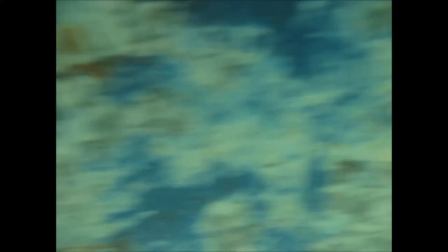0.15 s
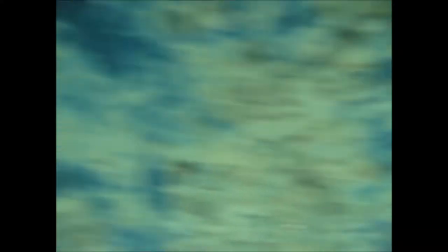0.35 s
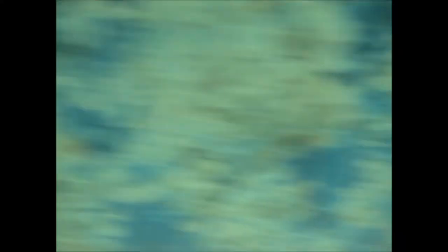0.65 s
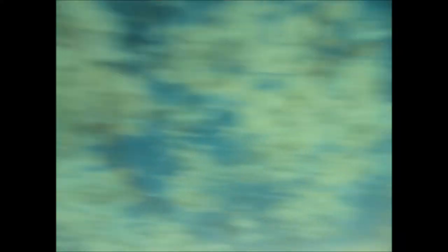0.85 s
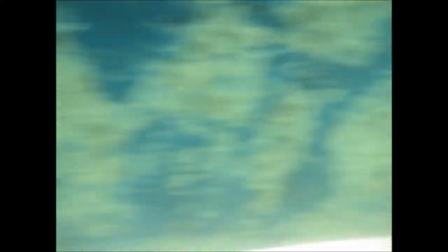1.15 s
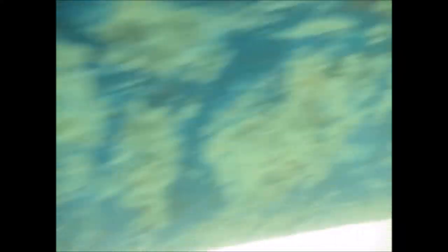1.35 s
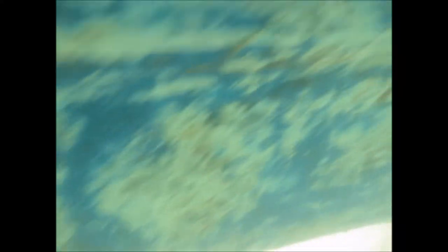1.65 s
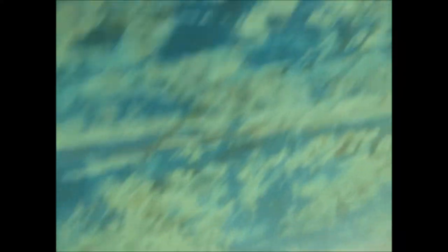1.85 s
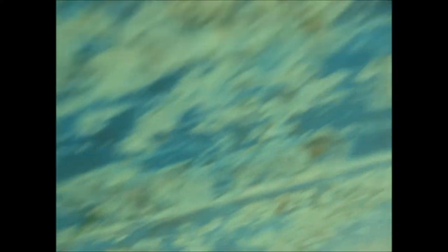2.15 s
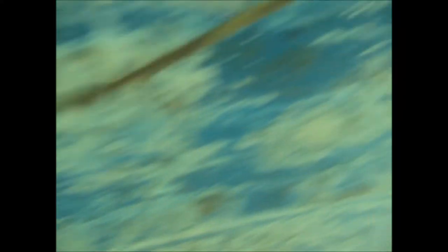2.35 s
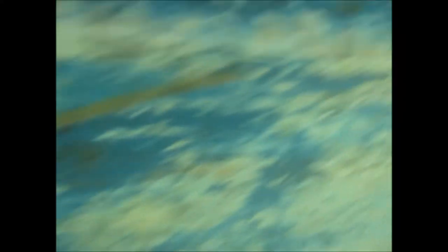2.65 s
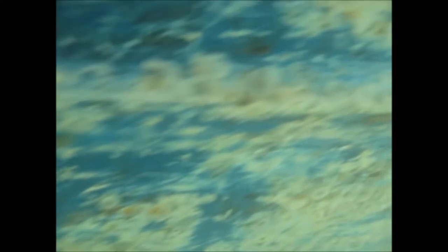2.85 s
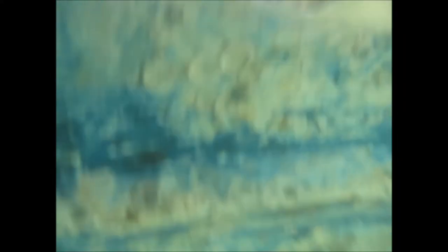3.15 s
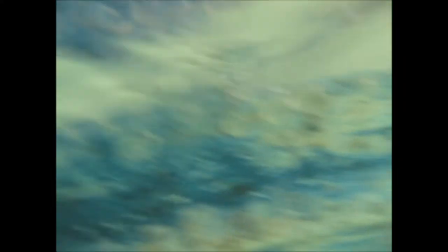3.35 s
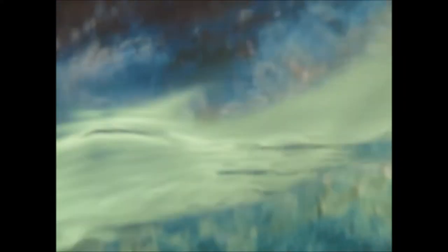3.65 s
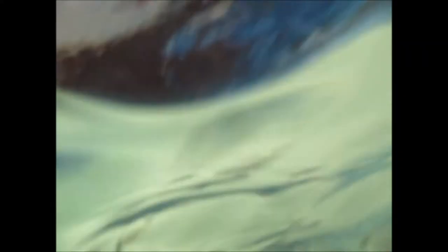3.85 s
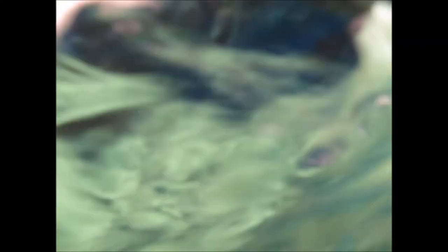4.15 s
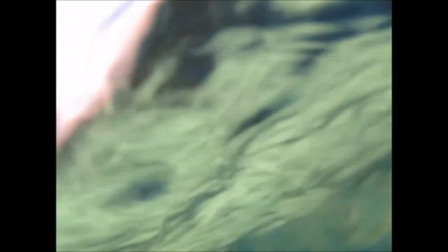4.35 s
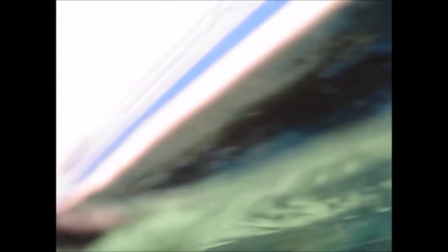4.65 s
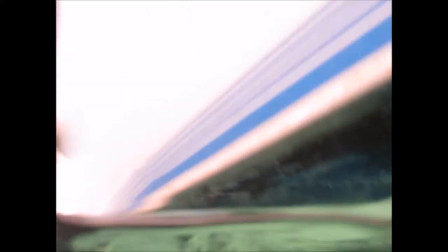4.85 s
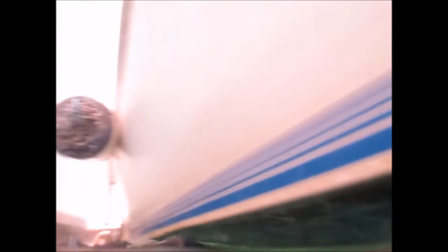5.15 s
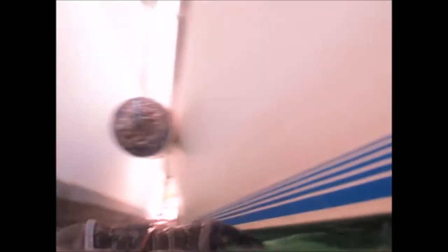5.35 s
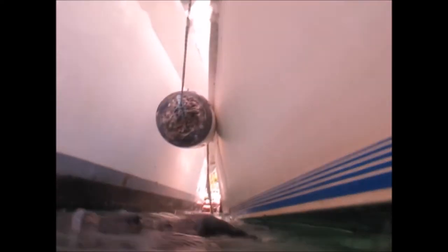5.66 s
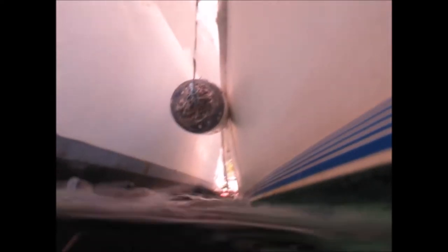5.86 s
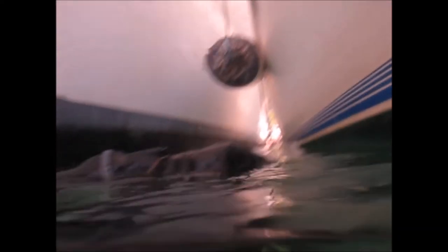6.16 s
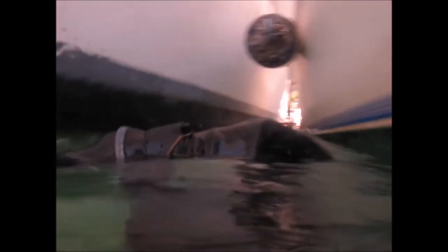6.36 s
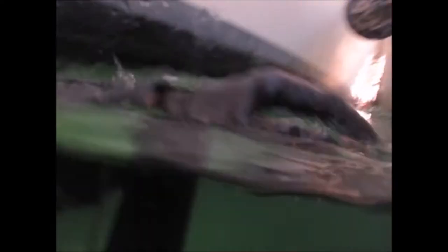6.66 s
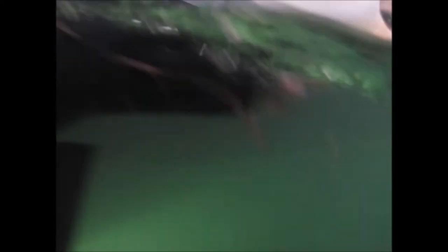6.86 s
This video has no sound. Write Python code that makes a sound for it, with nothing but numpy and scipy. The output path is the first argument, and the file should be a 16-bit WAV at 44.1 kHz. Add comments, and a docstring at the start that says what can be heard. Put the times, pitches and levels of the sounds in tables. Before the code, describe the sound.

Camera housing underwater by a boat hull: quiet ticking, isolated sharp clacks, a sudden burst of hard knocks, then restless watery clicks and fizz.

```python
"""Under water along a fouled boat hull, and then at the surface, a small camera moves in its plastic housing.
Knocks, skips and ticks excite damped housing modes; flow and grit noise drive the same modes as a wash.
Trapped air glugs as a decaying oscillation of wandering pitch; the hull and surface add a short diffuse tail.
The electronics add a shaped hiss and a thin whine; a converter limits the treble and mirrors a little of it."""
import sys
import numpy as np
from scipy import signal
from scipy.fft import rfft, irfft
from scipy.io import wavfile
from scipy.ndimage import uniform_filter1d

SR = 44100
rng = np.random.default_rng(int(sys.argv[2]) if len(sys.argv) > 2 else 0)


def voltage_ratio(level):
    """Linear amplitude factor for a level in decibels (scalar or array-like)."""
    return 10 ** (np.asarray(level, float) / 20)


def materialize(psi):
    """Save the field psi as 16-bit PCM at rate SR to the path in sys.argv[1].

    A 1-D psi becomes a single channel; in a 2-D psi each row is a channel.
    """
    bounded = np.clip(np.atleast_2d(psi).T, -1, 1)
    quanta = np.round(bounded * 32767).astype(np.int16)
    wavfile.write(sys.argv[1], SR, quanta)


N = 309141  # samples

# Knocks on the housing, before the hull's tail. Each row: start in seconds, favoured ring in Hz,
# peaks of the low, middle and treble bands in dB.
KNOCKS = [(0.2668, 1340, -38.5, -40, -45), (0.2869, 1440, -42.5, -35.5, -45.5),
          (0.399, 3720, -47, -39.5, -37), (0.4262, 2870, -41.5, -30, -60), (0.4639, 1580, -35, -42, -63),
          (0.5158, 2910, -36, -32.5, -32), (0.5975, 1430, -52, -53, -29.5),
          (0.779, 3490, -60.5, -42.5, -60), (0.8628, 5270, -63, -35.5, -56),
          (0.9823, 3000, -54, -46.5, -34.5), (1.0553, 1390, -56, -44, -40), (1.1277, 2900, -58, -51, -30.5),
          (1.318, 2570, -54, -40.5, -60), (1.392, 2900, -55, -42, -59.5), (1.43, 2880, -58, -41, -60),
          (1.479, 4150, -41, -20, -23.5), (1.4892, 3850, -37.5, -33, -36.5), (1.8604, 5560, -66, -34, -30),
          (1.9984, 1630, -24, -16.5, -14.5), (2.2878, 1560, -44, -51, -62), (2.319, 5370, -52, -44, -33),
          (2.4502, 3800, -26.5, -16.5, -21), (2.6783, 4050, -45, -30.5, -31.5),
          (2.7932, 894, -43, -65, -67), (2.9378, 650, -38.5, -48, -60), (3.1826, 1590, -12.5, -11, -11),
          (3.2414, 604, -37.5, -61, -53.5), (3.3984, 650, -38, -56, -36.5), (3.7571, 580, -50, -62, -46),
          (4.0928, 1340, -20.5, -23, -24.5), (4.2688, 3060, -9.5, -1.5, -10),
          (4.2807, 1320, -9.5, -7.5, -17), (4.3028, 3800, -28, -30, -60.5), (4.413, 670, -29, -35, -68),
          (4.4205, 1140, -20.5, -28.5, -63), (4.4461, 2620, -34, -35.5, -63), (4.5492, 1630, -28, -51, -54),
          (4.5665, 1640, -10.5, -6, -13.5), (4.5845, 2680, -12.5, -0.5, 0), (4.5939, 1530, -14.5, -19, -34),
          (4.641, 1376, -9, -6.5, -13), (4.664, 2980, -35, -14, -7.5), (4.6824, 1090, -3, -12, -42),
          (4.7238, 1410, -16, -22, -46), (4.729, 870, -21, -52, -39), (4.7983, 2980, -48, -26.5, -47),
          (4.8968, 2620, -40, -39.5, -60), (4.9209, 1130, -36, -60, -60), (5.0622, 2040, -24.5, -33, -48),
          (5.088, 2900, -43, -39.5, -27.5), (5.1032, 3200, -48, -24.5, -17.5),
          (5.1087, 1140, -26.5, -29, -31), (5.246, 1310, -26.5, -32.5, -58),
          (5.3184, 1390, -32.5, -37.5, -39), (5.3607, 1290, -29.5, -38, -60),
          (5.373, 3670, -27.5, -15.5, -30), (5.4326, 1250, -38, -32, -37), (5.4823, 1710, -28, -32, -48),
          (5.5844, 730, -31.5, -81, -66), (5.606, 1380, -36.5, -40.5, -30.5),
          (5.6732, 900, -51, -37.5, -40), (5.755, 1280, -34.5, -39, -35.5),
          (5.7695, 1400, -33, -28.5, -32.5), (5.8178, 1330, -15, -42, -29), (5.8498, 2460, -28.5, -28, -47),
          (5.864, 3730, -27, -24.5, -30.5), (5.9135, 1220, -29.5, -60, -58), (5.9412, 766, -38, -56, -55),
          (5.9552, 1160, -24, -61, -54.5), (6.0945, 1410, -35.5, -54, -43),
          (6.1887, 3400, -36, -41.5, -32.5), (6.3634, 1360, -32, -42, -57), (6.4078, 1340, -34, -57, -63),
          (6.4937, 1610, -18.5, -30, -29.5), (6.5068, 1570, -45.5, -24, -27.5),
          (6.5976, 1630, -50, -25, -24), (6.6442, 1130, -32, -35.5, -30), (6.6786, 1580, -29, -48, -30.5),
          (6.6951, 5430, -25.5, -4, -18.5), (6.7199, 565, -26.5, -34, -37), (6.7368, 3300, -42, -35, -21),
          (6.771, 5690, -48, -43, -23), (6.8562, 1420, -9, -32, -46), (6.897, 3320, -34, -20, -42.5),
          (6.9128, 1680, -28, -39, -10.5), (6.9311, 1430, -15.5, -21, -27), (6.9653, 4200, -47, -18, -19.5),
          (6.9731, 3220, -36, -23.5, -16.5)]
# Drags over growth. Each row: start in seconds, length in seconds, skips per second,
# typical peaks of the low, middle and treble bands in dB.
DRAGS = [(0.521, .105, 95, -52, -42, -38.5), (6.519, .05, 75, -45, -29.5, -42)]
# Modes of the housing. Each row: frequency in Hz, t60 in seconds, relative strength in dB.
HOUSING_MODES = [(650, 0.05, -1), (870, 0.048, 1), (1072, 0.011, 15), (1535, 0.009, 17.5),
                 (1938, 0.017, -4), (2294, 0.0084, -11), (2924, 0.005, 0.5), (3795, 0.0086, -4.5),
                 (4330, 0.0063, -6.5), (5100, 0.0059, -5.5), (6030, 0.0023, 0), (7160, 0.0036, -4),
                 (8260, 0.0046, -3), (9030, 0.0029, -0.5), (9940, 0.0016, 2)]
# Trapped air shifting. Each row: start in seconds, nominal peak in dB, mean pitch in Hz, t60 in seconds.
GLUGS = [(0.515, -43.5, 434, 0.14), (0.573, -42, 437, 0.093), (1.035, -37, 618, 0.048),
         (2.177, -49, 560, 0.095), (2.264, -30.5, 265, 0.11), (2.289, -35, 242, 0.11),
         (2.593, -36, 536, 0.1), (2.678, -46, 407, 0.14), (3.125, -43, 216, 0.1), (3.151, -45, 480, 0.021),
         (3.165, -48, 515, 0.032), (3.255, -32, 592, 0.023), (4.123, -38, 200, 0.089),
         (4.266, -23, 629, 0.089), (4.423, -23, 340, 0.042), (4.521, -31.5, 370, 0.066),
         (4.566, -23, 597, 0.12), (4.583, -31.5, 383, 0.076), (4.681, -11.5, 619, 0.042),
         (4.894, -44, 343, 0.1), (5.429, -38.5, 239, 0.056), (5.86, -31, 578, 0.036),
         (5.952, -33.5, 606, 0.051), (5.984, -37, 375, 0.032), (6.075, -39, 372, 0.068),
         (6.616, -42.5, 245, 0.086), (6.723, -29.5, 240, 0.13), (6.852, -27, 394, 0.056)]
# Surges of water and grit. Each row: start in seconds, length in seconds, fade time constant in seconds,
# rub level in dB, scrape level in dB.
SURGES = [(0.518, .09, .02, -54, -55.5), (1.053, .025, .015, -59, -58.5), (3.113, .05, .02, -61.5, -88),
          (3.362, .06, .015, -67.5, -57.5), (3.489, 0.022, .015, -56.5, -60.5),
          (3.807, .09, .02, -68.5, -62.5), (4.003, 0.013, .015, -62.5, -51.5),
          (4.148, .1, 0.012, -55.5, -51), (4.27, 0.025, .03, -48, -65), (4.504, 0.056, .025, -50, -53),
          (4.593, .12, .04, -37, -35.5), (5.011, .05, .06, -42.5, -48), (5.367, .03, .03, -49, -56),
          (5.468, .04, .02, -55, -59), (5.91, .39, .015, -57, -56), (6.427, .02, .01, -49.5, -55),
          (6.511, .3, .02, -48, -53.5), (6.726, .03, .02, -45, -52), (6.86, .16, .07, -42, -40)]
# Background flow under the surges, with its own swells of slosh and fizz.
# Each row: time in seconds, slosh, rub and fizz levels in dB.
FLOW = [(0, -61.5, -61, -68), (0.398, -64.5, -70.5, -69.5), (1.301, -62.5, -68, -69.5),
        (2.198, -69, -78, -73), (3.059, -63.5, -75, -72.5), (3.139, -51.5, -69.5, -73.5),
        (3.302, -60.5, -72, -70.5), (3.95, -71.5, -74.5, -68.5), (4.05, -54.5, -61, -63.5),
        (4.402, -57.5, -60.5, -69), (4.65, -43, -56, -64), (4.899, -63, -57.5, -66.5),
        (5.599, -61, -60, -67), (5.881, -59.5, -58, -66), (5.93, -57.5, -57, -64),
        (6.291, -57, -57.5, -62.5), (6.33, -64.5, -64, -74.5), (6.801, -70.5, -58, -53),
        (7.0, -59.5, -54.5, -52)]
# Spectral shape of the amplifier hiss. Each row: frequency in Hz, relative density in dB per Hz.
HISS_SHAPE = [(25, -43), (60, 6.5), (150, 12), (600, 8), (1500, 4.5), (3000, 1.5), (6000, -2.5),
              (11300, -13.5)]
# Filter on the mirrored treble above half the converter rate. Each row: frequency in Hz, gain in dB.
MIRROR_SHAPE = [(11760, -38), (11850, -20), (12300, -14), (13500, -18), (15800, -22), (15900, -46),
                (16500, -46), (16600, -90)]

LOW_TOP_HZ, MID_TOP_HZ = 2100, 5700  # limits between low, middle and treble
CONVERTER_HZ = 23520


def level(x, db):
    """Normalisation: scale to an rms level in dB."""
    return x * voltage_ratio(db) / np.sqrt(np.mean(x ** 2))


def shape(x, points):
    """Linear filtering: a gain curve through (Hz, dB) points, interpolated over log frequency."""
    hz, db = np.transpose(points)
    freqs = np.maximum(np.fft.rfftfreq(N, 1 / SR), 1)
    gain = voltage_ratio(np.interp(np.log(freqs), np.log(hz), db))
    return irfft(rfft(x) * gain, N)


def walk(rate):
    """Slow random modulation: levels held 1 / rate seconds and smoothed twice."""
    hold = int(SR / rate)
    steps = np.repeat(rng.standard_normal(N // hold + 1), hold)
    return 1.23 * uniform_filter1d(uniform_filter1d(steps, hold), hold)[:N]


def ring(hz, t60, size=2048):
    """Free vibration of damped modes: exponentially decaying sines along the last axis."""
    t = np.arange(size) / SR
    return np.sin(2 * np.pi * hz[..., None] * t) * np.exp(-np.log(1000) * t / t60[..., None])


def add(track, starts, sounds):
    """Superposition: lay each sound into the track at its start in seconds."""
    for start, sound in zip((starts * SR).astype(int), sounds):
        part = track[start:start + len(sound)]
        part += sound[:len(part)]


def groups(hz):
    """Band division: the low, middle and treble members of a set of modes."""
    return hz < LOW_TOP_HZ, (hz >= LOW_TOP_HZ) & (hz < MID_TOP_HZ), hz >= MID_TOP_HZ


def knocks(rows):
    """Impact excitation: a snap and a rough contact ring the modes, mostly those near a favoured ring."""
    starts, own_hz, *peak_db = rows.T
    count = len(starts)
    # a contact lasts a few cycles of the ring it favours, within a limit
    contact_ms = np.minimum(1000 * 2.73 / own_hz, 3)
    hz, t60, db = np.transpose(HOUSING_MODES)
    modes = len(hz)

    freqs = hz * (1 + .025 * rng.standard_normal((count, modes)))
    octaves = np.abs(np.log2(freqs / own_hz[:, None]))
    # a small spot hardly moves the big low modes
    octaves += 4.5 * np.maximum(np.log2(np.minimum(own_hz, 1500)[:, None] / freqs), 0)
    falloff_db, spread_db, own_db = 6.5, 1.5, 15.5  # falloff is per octave
    gains = voltage_ratio(db + spread_db * rng.standard_normal((count, modes)) - falloff_db * octaves)
    freqs = np.column_stack([freqs, own_hz])
    gains = np.column_stack([gains, np.full(count, voltage_ratio(own_db))])
    # the favoured ring lasts in step with the contact
    own_t60 = 7.8 * np.minimum(contact_ms, 2.6) / 1000
    decays = np.column_stack([np.tile(t60, (count, 1)), own_t60])
    rings = gains[..., None] * ring(freqs, decays)

    t_ms = 1000 * np.arange(512) / SR
    tau_ms = 0.79 * np.maximum(contact_ms - .4, .2)[:, None]
    rough = voltage_ratio(-15) * rng.standard_normal((count, 512))
    push = rough * np.minimum(t_ms / 0.33, 1) * np.exp(-t_ms / tau_ms)
    push[:, 12] += 1 / tau_ms[:, 0]  # short contacts snap, long ones rasp

    out = np.zeros(N)
    bands = [(560, LOW_TOP_HZ), (LOW_TOP_HZ, MID_TOP_HZ), (MID_TOP_HZ, 12000)]  # Hz
    for member, band_peak_db, edges in zip(groups(freqs), peak_db, bands):
        body = signal.fftconvolve((rings * member[..., None]).sum(axis=1), push, axes=1)
        band = signal.butter(2, edges, "bandpass", fs=SR, output="sos")
        body = signal.sosfilt(band, body)
        top = np.abs(signal.hilbert(body)).max(axis=1)
        add(out, starts - .0003, body * (voltage_ratio(band_peak_db) / top)[:, None])
    return out


def drags():
    """Stick and slip: friction releases in a run of small knocks at an uneven pace."""
    jitter, spread_db = 0.27, 3.5  # jitter in skip periods
    rows = []
    for start, length, rate, *db in DRAGS:
        late, spot, *size = rng.standard_normal((16, 5)).T
        starts = start + (np.arange(len(late)) + jitter * late) / rate
        own_hz = 2000 * 1.69 ** spot
        peak_db = np.add(db, spread_db * np.transpose(size))
        skips = np.column_stack([starts, own_hz, peak_db])
        rows.append(skips[starts < start + length])
    return np.vstack(rows)


def ticks(water):
    """Random impacts: grit and drops tick more often and louder where the water is loud."""
    count, crowding = 220, .15  # crowding: exponent of the loudest water amplitude
    over_wash_db, spread_db = (10, 13, 18), 4  # low, middle, treble over the wash; scatter
    when, spot = rng.random((count, 2)).T
    busy = np.cumsum(voltage_ratio(crowding * water[1:].max(axis=0)))
    at = np.clip(np.searchsorted(busy / busy[-1], when), 20, N - 1)
    peak_db = water[1:, at].T + over_wash_db + spread_db * rng.standard_normal((count, 3))
    return np.column_stack([at / SR, 700 * 6.5 ** spot, peak_db])


def glugs():
    """Bubble oscillation: an air pocket swings, pitch and size wandering with its shape, then gurgles out."""
    wobble, flutter_db, tail_db, tail_times = 0.097, 3.1, -35, 12  # the tail lasts 12 times as long
    starts, db, hz, t60 = np.transpose(GLUGS)
    t = np.arange(8192) / SR
    noise = rng.standard_normal((len(starts), 2, 8192))
    drift, flutter = uniform_filter1d(noise, 250).transpose(1, 0, 2) * np.sqrt(250)
    phase = 2 * np.pi * np.cumsum(hz[:, None] * (1 + wobble * drift), axis=1) / SR
    fade = np.log(1000) * t / np.maximum(t60, .01)[:, None]
    decay = np.exp(-fade) + voltage_ratio(tail_db) * np.exp(-fade / tail_times)
    swing = np.minimum(t / 0.0036, 1) * decay * voltage_ratio(flutter_db * flutter)
    out = np.zeros(N)
    add(out, starts, voltage_ratio(db)[:, None] * swing * (np.sin(phase) + 0.12 * np.sin(2 * phase)))
    return out


def water_db():
    """Power addition: slosh, rub, scrape and fizz levels of background flow plus surges that rise, hold, fade."""
    rise_share = 0.73  # rise time over fade time
    slosh_over_rub_db, fizz_over_scrape_db, flow_scrape_over_rub_db = -11.5, -4.5, -3.5
    t = np.arange(N) / SR
    s, slosh, rub, fizz = np.transpose(FLOW)
    curves = (slosh, rub, rub + flow_scrape_over_rub_db, fizz)
    power = voltage_ratio(2 * np.array([np.interp(t, s, curve) for curve in curves]))
    for start, length, fade, rub, scrape in SURGES:
        rise_part = np.minimum(t - start, 0) / (rise_share * fade)
        fade_part = np.maximum(t - start - length, 0) / fade
        swell = np.exp(rise_part - fade_part)
        surge_db = np.array([rub + slosh_over_rub_db, rub, scrape, scrape + fizz_over_scrape_db])
        power += voltage_ratio(2 * surge_db)[:, None] * swell ** 2
    return 10 * np.log10(power)


def grit(rate, spread_db, smooth_db):
    """Shot noise: short grains of unequal size, rate per second, over smooth flow noise."""
    size = voltage_ratio(spread_db * np.minimum(rng.exponential(size=N), 2.5))
    grains = (rng.random(N) < rate / SR) * size
    bursts = np.convolve(grains, np.exp(-np.arange(256) / 40))[:N] * rng.standard_normal(N)
    return level(bursts, 0) + voltage_ratio(smooth_db) * rng.standard_normal(N)


def wash(slosh_db, *mode_db):
    """Forced vibration: flow and grit drive modes that flare as water covers their spots; eddies slosh below."""
    hz, t60, db = np.transpose(HOUSING_MODES)
    signs = (-1.) ** np.arange(len(hz))[:, None]
    modes = voltage_ratio(db)[:, None] * ring(hz, t60) * signs
    shared, lumps = grit(120, 4.0, 2.5), walk(35)
    eddies = grit(50, 2.4, 3.6)
    slosh = shape(eddies, [(30, -65), (90, -13), (200, -3.5), (400, -2.5), (600, -3), (900, -15), (2000, -71)])
    out = level(slosh, 0) * voltage_ratio(slosh_db + 3.9 * walk(15))
    # rub drives the low modes, scrape the middle, fizz the treble
    for member, curve_db in zip(groups(hz), mode_db):
        drive = shared + voltage_ratio(-3) * grit(200, 4.0, -1.5)
        body = np.zeros(N)
        for mode in modes[member]:
            flaring = drive * voltage_ratio(2.8 * walk(25))
            body += signal.fftconvolve(flaring, mode)[:N]
        out = out + level(body, 0) * voltage_ratio(curve_db + 2.2 * lumps)
    return out


def hull(x):
    """Diffuse reflection: the hull and the surface close by send back a short noise-like tail."""
    echo_db, t60 = -6, 0.017  # t60 in s
    t = np.arange(2048) / SR
    tail = rng.standard_normal(2048) * np.exp(-np.log(1000) * t / t60) * np.minimum(t / 0.0022, 1)
    return x + voltage_ratio(echo_db) * signal.fftconvolve(x, tail / np.linalg.norm(tail))[:N]


def electronics():
    """Circuit noise: shaped amplifier hiss and a slightly wavering tone at a quarter of the converter rate."""
    hiss_db, whine_db = -63, -60.5  # rms
    hiss = level(shape(rng.standard_normal(N), HISS_SHAPE), hiss_db)
    whine = np.sqrt(2) * np.sin(2 * np.pi * CONVERTER_HZ / 4 * np.arange(N) / SR)
    return hiss + voltage_ratio(whine_db + 0.47 * walk(23)) * whine


def scene():
    """Transmission: the housing's port thins the bass of everything outside; the electronics add after it."""
    water = water_db()
    hits = knocks(np.vstack([KNOCKS, ticks(water), drags()]))
    outside = hull(hits) + glugs() + wash(*water)
    through_port = shape(outside, [(20, -13), (120, -2.5), (250, -2.0)])
    return (through_port + electronics())[None]


def roll_off(x):
    """The treble ends steeply here."""
    return signal.sosfilt(signal.butter(12, 16510, fs=SR, output="sos"), x)


def record(dry):
    """Sampling: the converter fades out at half its rate and leaves a weak mirror image above it."""
    limited = shape(dry[0], [(20, 0), (11000, 0), (11400, -5), (11680, -16), (11760, -34), (11790, -90)])
    spec = rfft(limited)
    half = int(CONVERTER_HZ / 2 * N / SR)  # spectral bin of half the converter rate
    mirror = np.zeros_like(spec)
    mirror[half:] = np.conj(spec[half:2 * half - len(spec):-1])
    grain = level(rng.standard_normal(N), -57)  # rounding noise of the converter, before its filter
    image = shape(irfft(mirror, N) + grain, [(11700, -83)] + MIRROR_SHAPE)
    mix = np.clip(irfft(spec, N) + image, -1, 1)[None]
    return roll_off(mix)


dry = scene()
out = record(dry)
materialize(out)
```